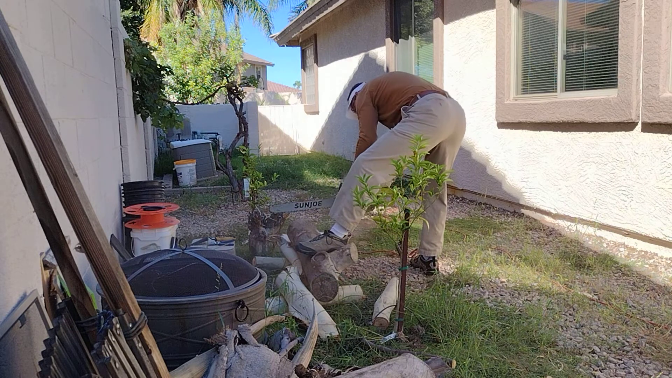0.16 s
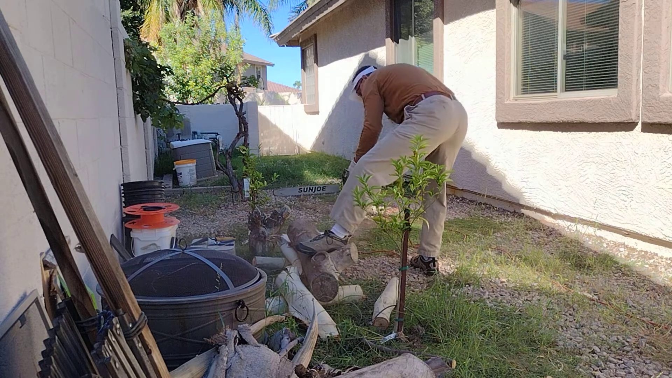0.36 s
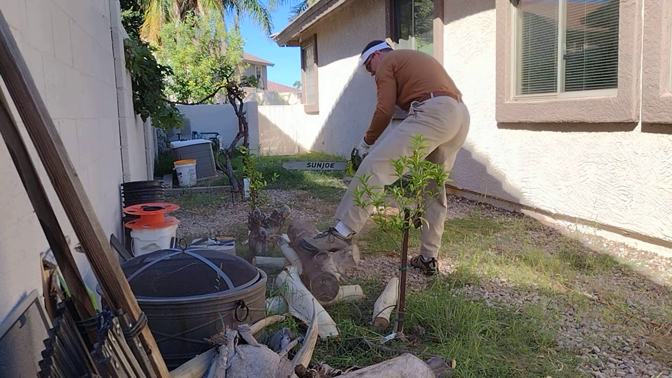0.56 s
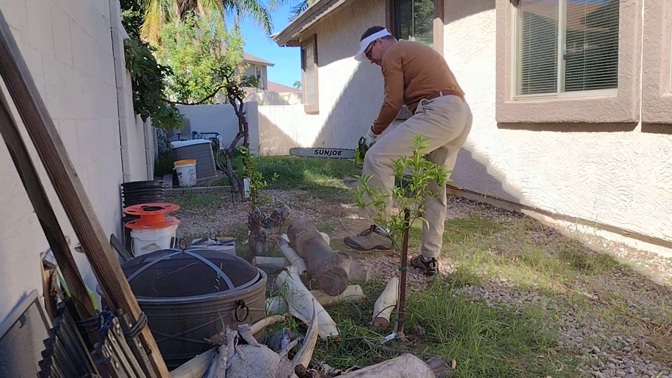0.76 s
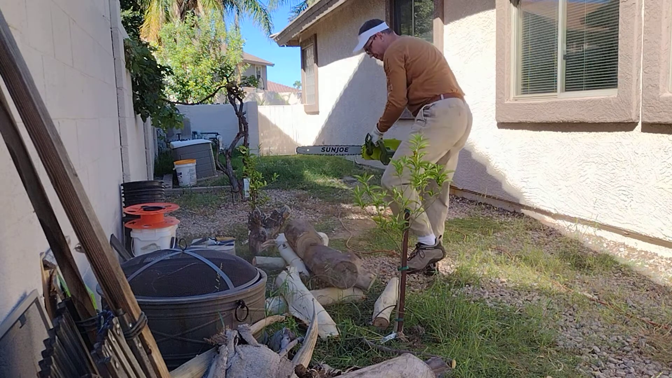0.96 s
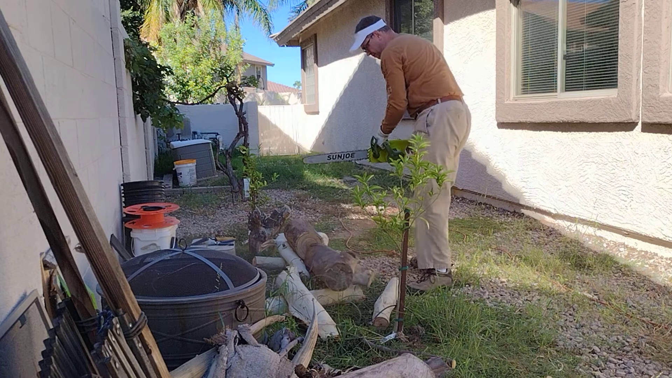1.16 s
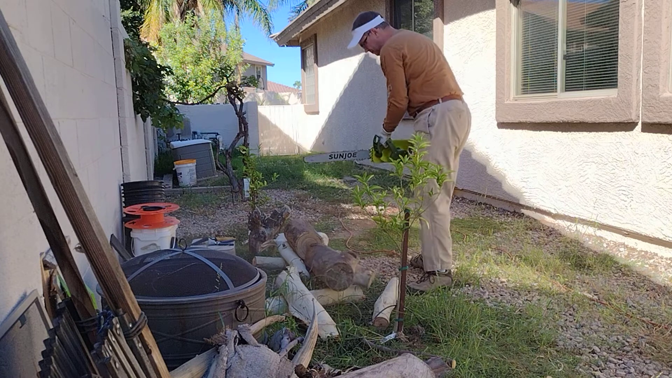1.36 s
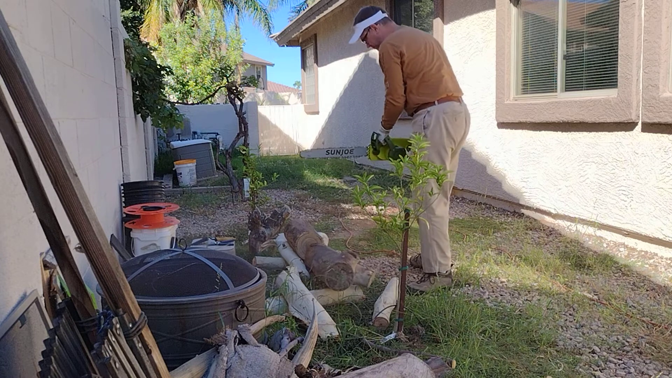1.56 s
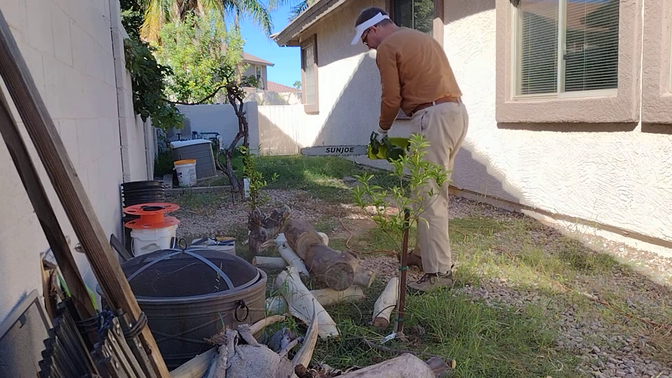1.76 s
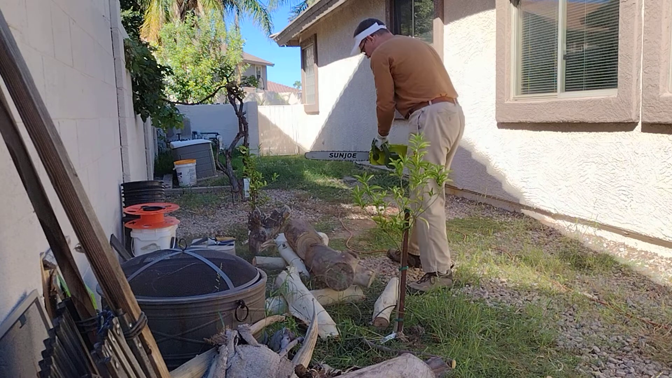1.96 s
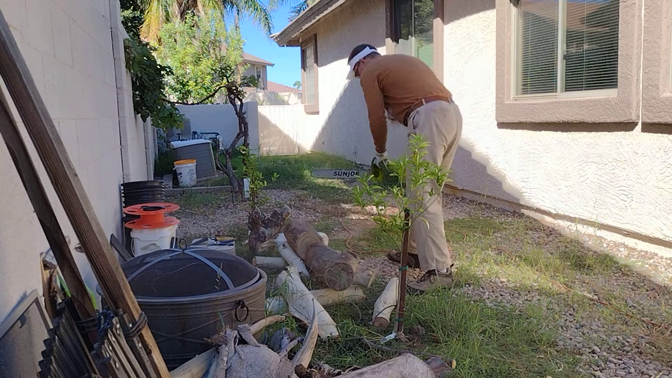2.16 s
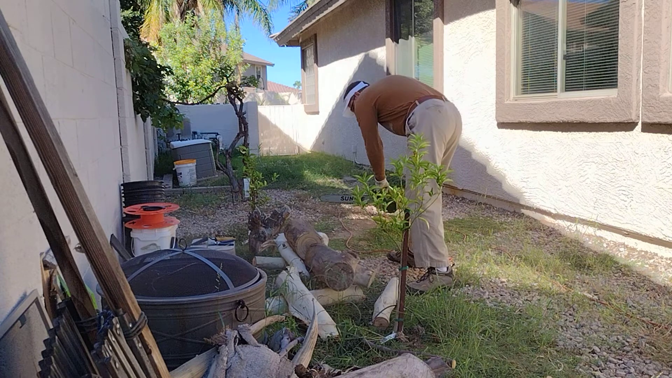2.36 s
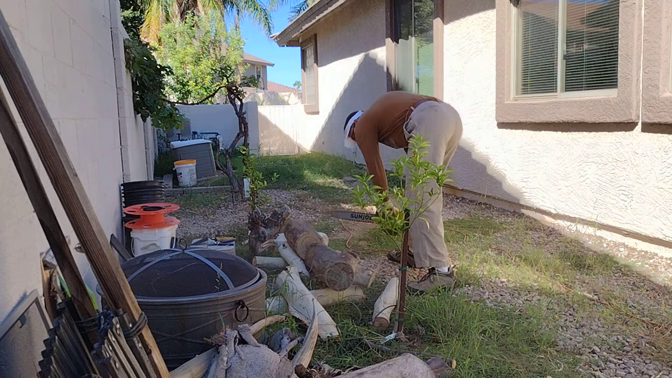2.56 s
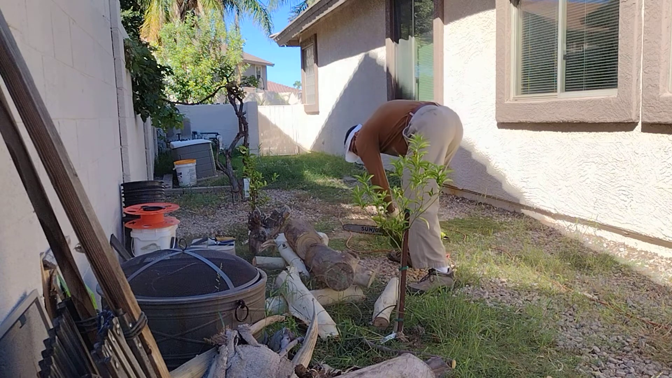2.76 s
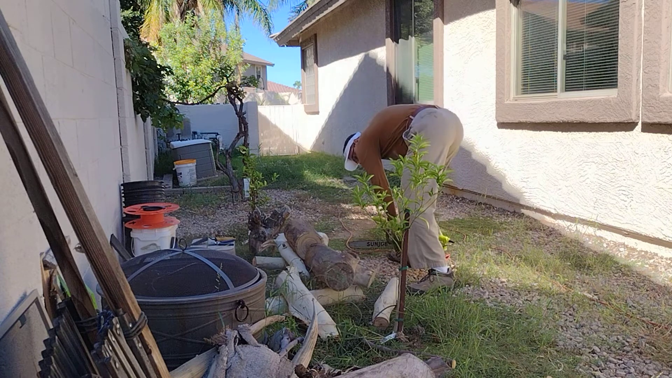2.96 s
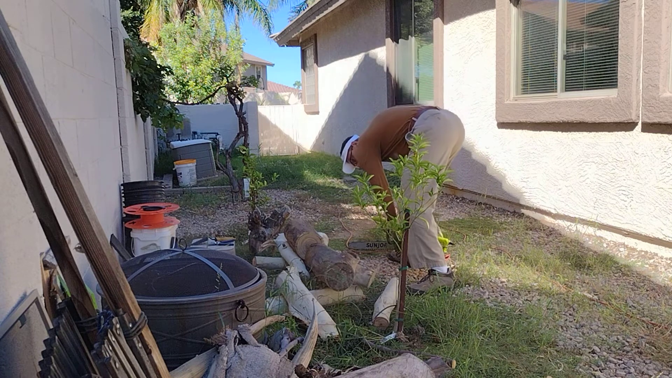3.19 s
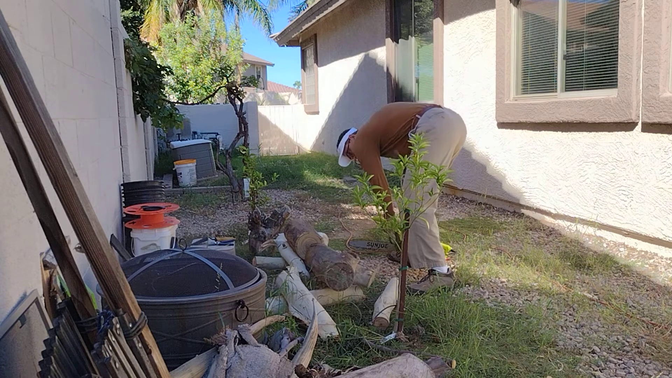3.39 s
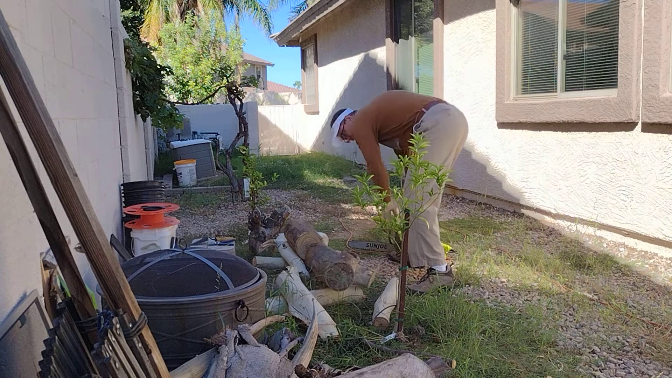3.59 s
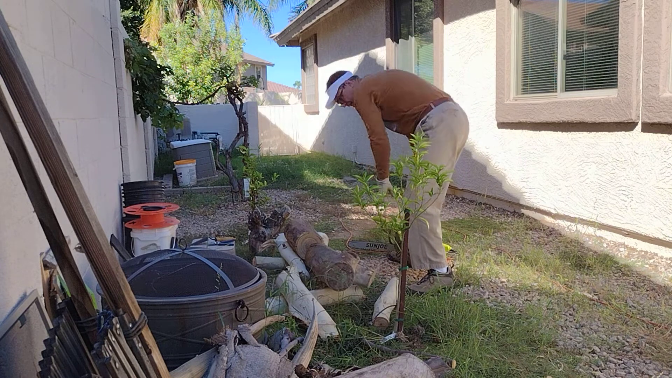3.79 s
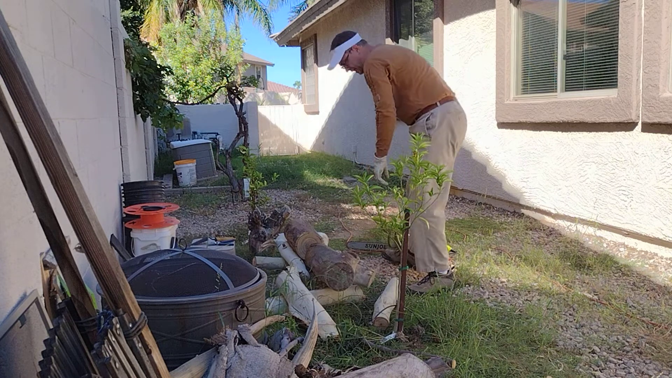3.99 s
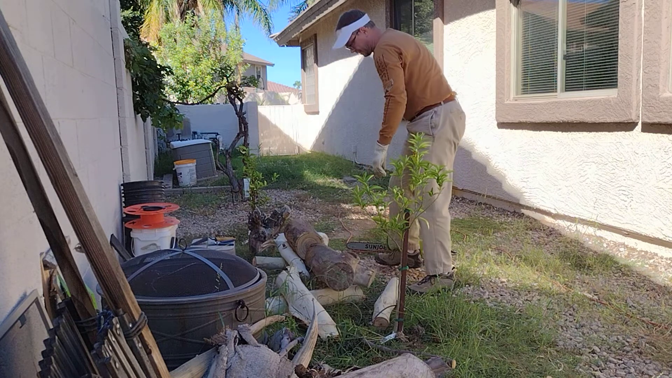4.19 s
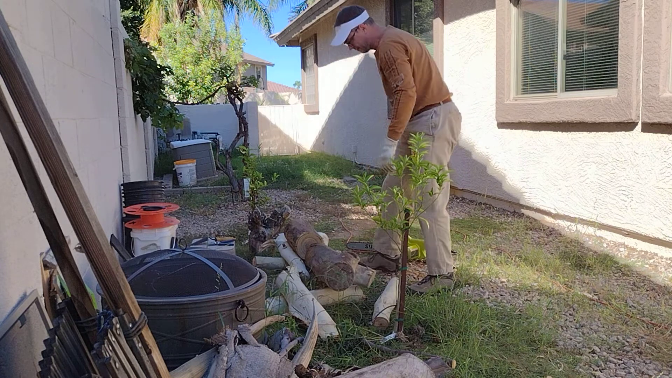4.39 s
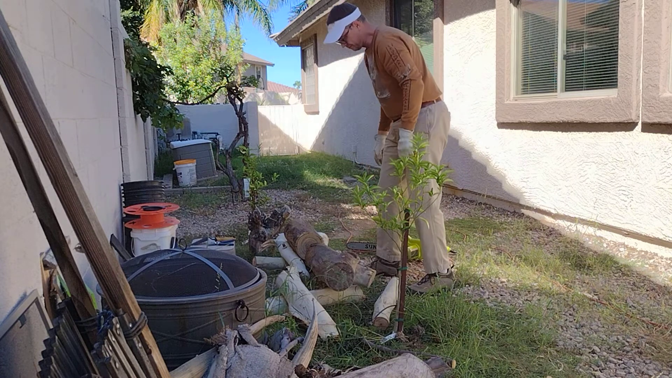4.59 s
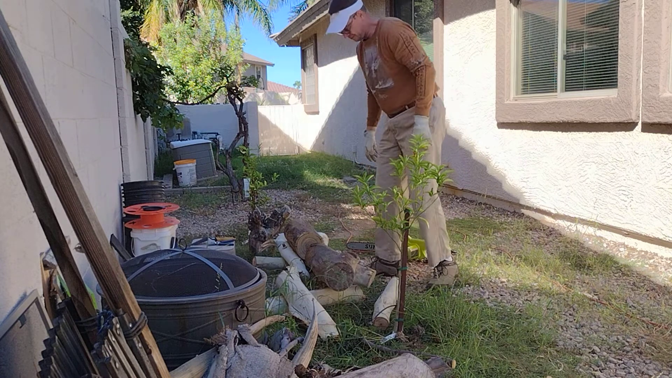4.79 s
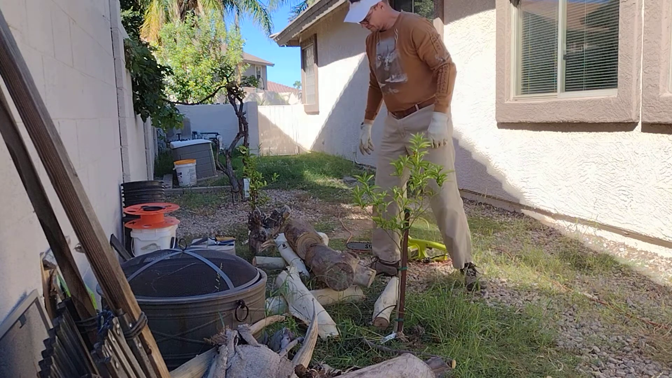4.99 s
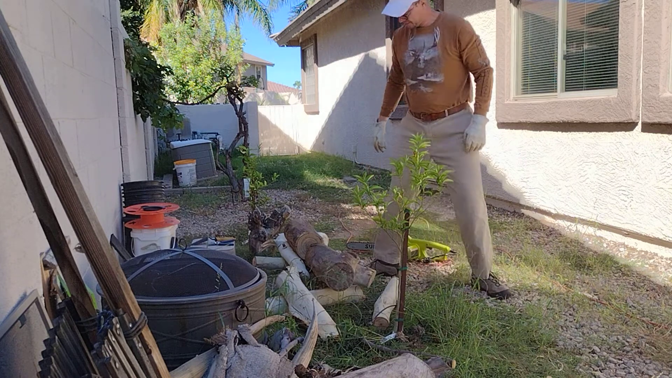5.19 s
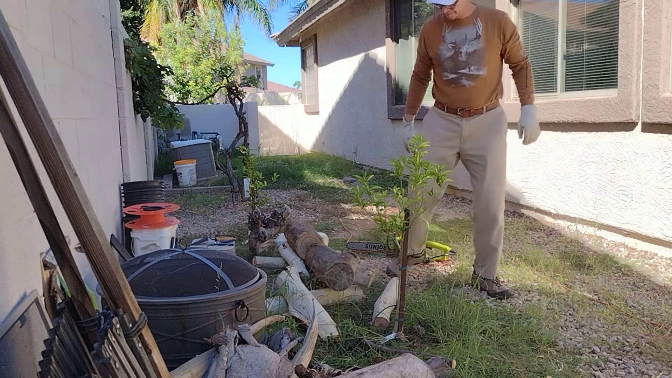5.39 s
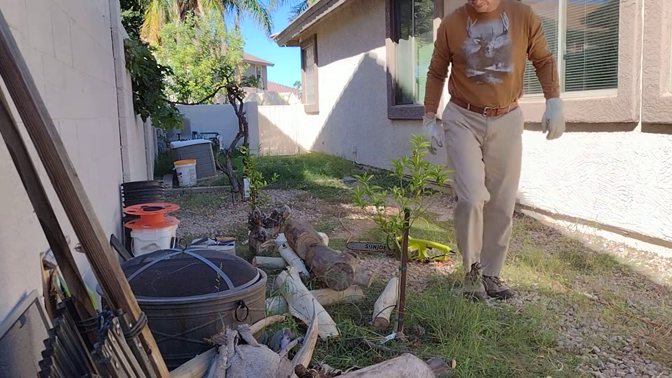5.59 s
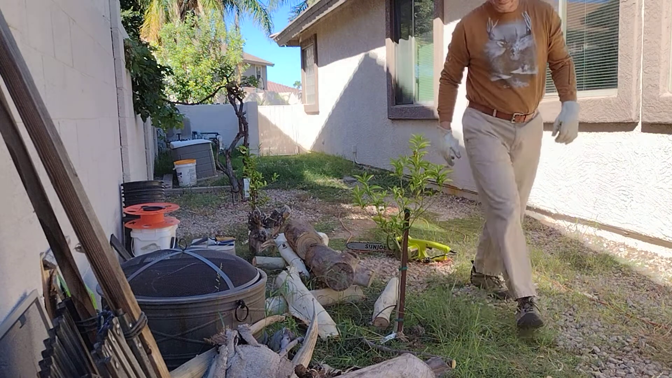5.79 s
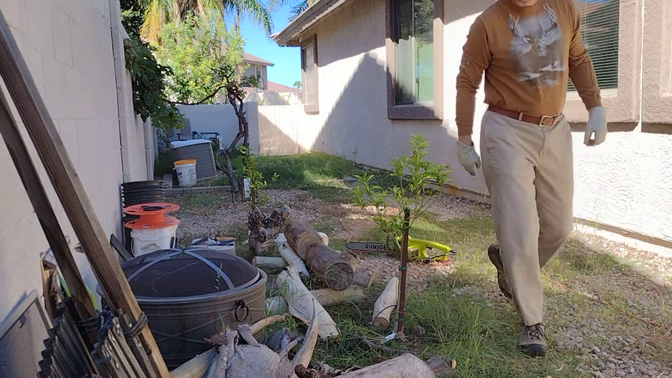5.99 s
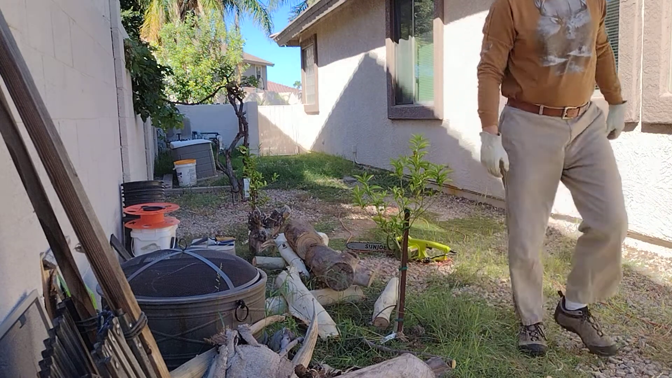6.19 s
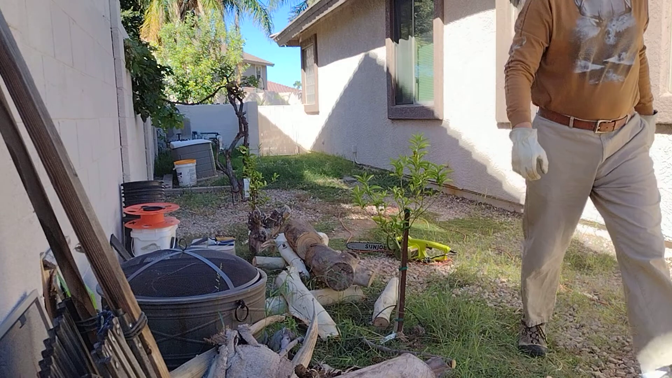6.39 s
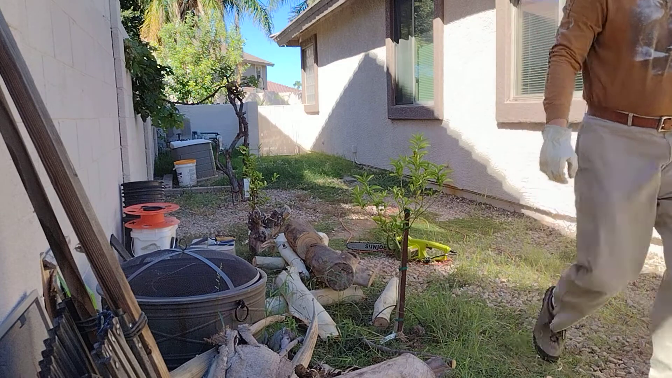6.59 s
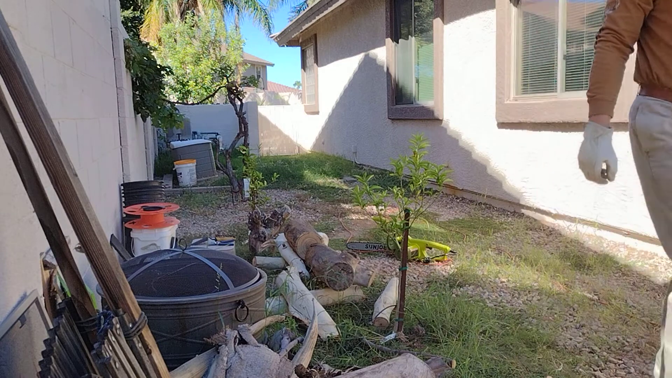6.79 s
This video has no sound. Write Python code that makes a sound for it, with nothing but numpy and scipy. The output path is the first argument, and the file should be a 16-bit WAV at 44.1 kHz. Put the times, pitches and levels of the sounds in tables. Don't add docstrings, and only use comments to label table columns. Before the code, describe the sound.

An electric chainsaw whines down to a stop, is set down with a woody clunk, then footsteps crunch closer over gravel and dry grass.

```python
import sys
import numpy as np
from scipy import signal
from scipy.io import wavfile

SR = 44100
rng = np.random.default_rng(int(sys.argv[2]) if len(sys.argv) > 2 else 0)


def ratio_of_db(decibels):
    return 10 ** (np.asarray(decibels, float) / 20)


def waveform_to_disk(signal):
    frames = np.transpose(np.atleast_2d(signal))
    scaled = np.clip(frames, -1, 1) * 32767
    samples = np.round(scaled).astype(np.int16)
    wavfile.write(sys.argv[1], SR, samples)


N = 302084


def in_time(rows):
    s, *columns = np.transpose(rows)
    return np.array([np.interp(np.arange(N) / SR, s, c) for c in columns])


def at_hz(points, hz):
    table_hz, values = np.transpose(points)
    return np.interp(np.log(hz), np.log(table_hz), values)


def rms_one(x):
    return x / np.sqrt(np.mean(x ** 2) + 1e-20)


def highpass(x, hz):
    return signal.sosfilt(signal.butter(2, hz, "high", fs=SR, output="sos"), x)


def drift(rate, order=1):
    r = np.exp(-80 * np.pi * rate / SR)
    noise = rng.standard_normal(N // 40 + 2002)
    slow = signal.lfilter([1], [1, -2 * r, r * r], noise)[2000:]
    return np.interp(np.arange(0, N, order) / 40, np.arange(len(slow)), rms_one(slow - slow.mean()))


def tone(hz, level_db, wobble_db, rate):
    strength = np.sqrt(2) * ratio_of_db(level_db + wobble_db * drift(rate)[:len(hz)])
    return strength * np.sin(2 * np.pi * (np.cumsum(hz) / SR + rng.random()))


# f/Hz, likeness/0-1
EAR_LIKENESS = [(30, 0.95), (120, 0.88), (300, 0.92), (450, 0.57), (700, 0), (1200, 0), (2500, .2),
                (8000, 0)]


def coloured(gate, colour, zones, zone_db, patchy_db, lean, wide):
    fine = np.geomspace(20, 16000, 600)
    power = ratio_of_db(at_hz(colour, fine)) ** 2 * np.gradient(fine)
    zone_power = [power[(fine > low) & (fine < high)].sum() for low, high in zones]
    bend_db = 20 * np.log10(ratio_of_db(zone_db) / np.sqrt(np.c_[zone_power]))
    middles = [(low ** .75 * high ** .25, low ** .25 * high ** .75) for low, high in zones]
    centres = np.log(middles).ravel()
    n = gate.shape[-1]
    white = gate * rng.standard_normal((2, 2, n))
    out = np.zeros((2, n))
    edges = np.geomspace(colour[0][0], 16500, round(3 * np.log2(16500 / colour[0][0])))
    for k, (low, high) in enumerate(zip(edges, edges[1:])):
        band = signal.butter(2, [low, high], "band", fs=SR, output="sos")
        mid, side = signal.sosfilt(band, white[k % 2])
        hz = np.sqrt(low * high)
        shares = np.array([np.interp(np.log(hz), centres, one.repeat(2)) for one in np.eye(len(zones))])
        patches_db = patchy_db * drift(14, order=64)[:zone_db.shape[1]]
        gain = ratio_of_db(at_hz(colour, hz) + shares @ bend_db + patches_db) * np.sqrt(SR / 2)
        gain = np.interp(np.arange(n) / 64, np.arange(len(gain)), gain)
        alike = np.clip(at_hz(EAR_LIKENESS, hz), -1, 1)
        spread = wide * np.sqrt((1 - alike) / (1 + alike)) * side * [[1], [-1]]
        ears = ratio_of_db(at_hz(lean, hz) * np.array([[.5], [-.5]]))
        out += gain * ears * (mid + spread)
    return out


def ring(clicks, hz, t60):
    r, w = ratio_of_db(-60 / (t60 * SR)), 2 * np.pi * hz / SR
    return signal.lfilter([0, np.sin(w)], [1, -2 * r * np.cos(w), r * r], clicks)


def resonant(x, peaks):
    out = x.copy()
    for hz, width_hz, lift_db in peaks:
        r = np.exp(-np.pi * width_hz / SR)
        poles = [1, -2 * r * np.cos(2 * np.pi * hz / SR), r * r]
        out += (ratio_of_db(lift_db) - 1) * signal.lfilter([(1 - r * r) / 2, 0, (r * r - 1) / 2], poles, x)
    return out


def yard(x, wet_db):
    n, t = x.shape[1], np.arange(SR // 3) / SR
    noise = signal.lfilter([.6], [1, -.2], rng.standard_normal((2, 2, len(t))))
    washes = highpass(noise * ratio_of_db(-60 * t / .24) * (t > .003), 330)
    washes = washes / np.sqrt((washes ** 2).sum(axis=2, keepdims=True))
    turn = 2 * np.pi * 1.3 * np.arange(n) / SR
    shares = [np.cos(turn), np.sin(turn)]
    wet = sum(signal.oaconvolve(x * share, wash, axes=1)[:, :n] for share, wash in zip(shares, washes))
    return (x + ratio_of_db(wet_db) * wet) / np.sqrt(1 + ratio_of_db(wet_db) ** 2)


BRIGHT_SHARE = [-1.0, 0, 1.0, .8]


def swells(rows, zone_db):
    s, rise, fall, level_db, bright_db = np.transpose(rows)[:, :, None]
    t = np.arange(0, N, 64) / SR - s
    shape = ratio_of_db(level_db - 20 * np.maximum(-t / rise, t / fall)) ** 2
    return ratio_of_db(np.array(zone_db)[:, None] + np.outer(BRIGHT_SHARE, bright_db)) ** 2 @ shape


FULL_SPEED_DB = [-41, -36, -44, -50.5]
DB_PER_DECADE = [28, 29.5, 40.5, 52.1]
CHIPS_DB = [-42, -43, -30, -32]
CHIPS_END_DB_PER_S = [40, 40, 60, 200]
# t/s, level/dB
LAST_LINKS = [
    (1.18, -57),
    (1.535, -60),
    (1.69, -60),
    (1.757, -63),
    (1.805, -58),
]


def saw_levels(whine_hz):
    t = np.arange(len(whine_hz)) * 64 / SR
    rattle_db = np.c_[FULL_SPEED_DB] + np.c_[DB_PER_DECADE] * np.log10(whine_hz / whine_hz[0])
    rattle_db = rattle_db - 130 * (t - 1.8).clip(0)
    chips_db = np.c_[CHIPS_DB] - 28 * t - np.c_[CHIPS_END_DB_PER_S] * (t - .5).clip(0)
    catches = [(s, .016, .05, db, 0) for s, db in LAST_LINKS]
    links = swells(catches, [-1, 1, -11, -18])[:, :len(t)]
    return 10 * np.log10(ratio_of_db(rattle_db) ** 2 + ratio_of_db(chips_db) ** 2 + links + 1e-13)


# low f/Hz, high f/Hz
SAW_ZONES = [(350, 1000), (1000, 2900), (2900, 6000), (6000, 15500)]
# f/Hz, level/dB per Hz
SAW_COLOUR = [(88, -40.5), (150, -7), (213, -19), (291, -10.5), (420, -8), (684, -4), (864, -3),
              (2890, -10), (3440, -3), (4980, -11), (7640, 0), (15700, -10)]
# f/Hz, level/dB
SAW_LEAN = [(60, -2), (180, -10), (550, 0.5), (1650, 1), (4970, -4), (15000, 1.5)]


def chain_rattle(shaft_hz, levels_db):
    n = len(shaft_hz)
    links = np.cumsum(shaft_hz * 3 * (1 + .03 * drift(60)[:n])) / SR % 1
    gate = rms_one(.7 + ratio_of_db(3 * drift(71)[:n]) * np.exp(-3.0 * links))
    return coloured(gate, SAW_COLOUR, SAW_ZONES, levels_db, patchy_db=0.5, lean=SAW_LEAN, wide=0.55)


# turns off, level/dB
SIDEBANDS = [(0, 0), (.5, -7), (-.5, -11)]
# f/Hz, level/dB
WHINE_COLOUR = [(450, -90), (900, -82), (1150, -74), (1350, -65), (1550, -72), (1800, -77), (2400, -69),
                (3100, -76), (3700, -76), (4700, -70), (5300, -75), (5900, -74), (6600, -70), (7600, -45),
                (8300, -51), (8900, -51), (9700, -44)]


def motor_whine(whine_hz, shaft_hz):
    n, out = len(whine_hz), 0
    for turns, side_db in SIDEBANDS:
        hz = (whine_hz + turns * shaft_hz) * (1 + .002 * drift(60)[:n])
        out = out + tone(hz, at_hz(WHINE_COLOUR, whine_hz) + side_db, wobble_db=3, rate=20)
    slot_hz = 24 * shaft_hz
    slot_colour = [(400, -85), (560, -75), (720, -68), (900, -74), (2400, -70), (3500, -80), (7500, -70)]
    slot_db = at_hz(slot_colour, slot_hz)
    return out + tone(slot_hz * (1 + .006 * drift(40)[:n]), slot_db, wobble_db=4, rate=20)


# multiple of the turn, level/dB
SHAFT = [(1, -56.5), (2, -54.5), (3, -50.5), (6, -49), (9, -48.5), (12, -50), (40 / 3, -46), (18, -56)]


def shaft_hum(shaft_hz, load_db):
    n = len(shaft_hz)
    return sum(tone(turns * shaft_hz * (1 + .012 * drift(25)[:n]), level_db + load_db, wobble_db=1.5, rate=15)
               for turns, level_db in SHAFT)


def gear_teeth(shaft_hz, load_db, housing_db):
    n = len(shaft_hz)
    turn = 2 * np.pi * np.cumsum(shaft_hz * (1 + .006 * drift(15)[:n])) / SR
    comb = np.zeros(n)
    for k in range(4, 29):
        tooth_db = rng.normal(0, 1.5) - .5 * (k - 10)
        comb += np.sin(k * turn + 2 * np.pi * rng.random()) * ratio_of_db(tooth_db)
    level_db = housing_db.repeat(64)[:n] - 21 - .15 * load_db.clip(-35, 0)
    return ratio_of_db(level_db) * highpass(comb, 650)


# t/s, f/Hz
SPEED = [(0, 10130), (.2, 8910), (.47, 7355), (.7, 6150), (.85, 5355), (1.0, 4620), (1.15, 3940),
         (1.32, 3280), (1.55, 2200), (1.7, 1420), (1.8, 920), (1.9, 450)]
# t/s, share/0-1
SWING = [
    (0, 0),
    (.25, .2),
    (.5, 1),
    (.95, 1),
    (1.3, .6),
    (1.8, .1),
]
# f/Hz, width/Hz, level/dB
HOUSING = [(480, 150, 2), (1900, 610, 1.5), (2500, 370, 3), (2580, 120, 1.5), (3350, 120, 2),
           (3976, 71, -0.5), (4540, 78, -2.5)]


def saw():
    n = round(2.1 * SR)
    whine_hz = in_time(SPEED)[0, :n]
    shaft_hz = whine_hz / 33
    levels_db = saw_levels(whine_hz[::64])
    load_db = 45 * np.log10(whine_hz / whine_hz[0])
    rattle = chain_rattle(shaft_hz, levels_db)
    whine = motor_whine(whine_hz, shaft_hz)
    teeth = gear_teeth(shaft_hz, load_db, levels_db[1])
    swung = in_time(SWING)[0, :n].clip(0, 1)
    end_on = resonant(rattle + teeth, [(864, 110, 5)])
    side_on = resonant(rattle + teeth, [(1190, 150, 6)])
    shell = (1 - swung) * end_on + swung * side_on
    body = ratio_of_db(-2) * resonant(shell, HOUSING) + shaft_hum(shaft_hz, load_db) + .4 * whine
    lead = round(.2 * SR)
    echoed = yard(np.pad(body, ((0, 0), (lead, 0)), "reflect"), wet_db=2.0)[:, lead:]
    sound = echoed + (.9 * whine + ratio_of_db(-1.5) * teeth) * ratio_of_db([[-1.5], [1.5]])
    return np.pad(sound, ((0, 0), (0, N - n)))


# t/s, blade rate f/Hz, blade level/dB, how far the exhaust faces this way level/dB
PLANE = [
    (0, 108.2, -51, -6),
    (.7, 107.8, -48, 5.5),
    (1.5, 107.3, -49, -4.5),
    (2.2, 106.8, -53, -10),
    (3, 106.4, -54.5, -5),
    (3.8, 105.8, -53, 2.5),
    (5.2, 105.05, -54, -1),
    (6.0, 104.6, -56, 0),
    (6.85, 104.3, -55, -1),
]
# times the blade rate, level/dB, share of the blade swell, share of the facing
EXHAUST = [(2, -64.5, 1.88, 0.0), (5 / 2, -65, .4, .4), (17 / 6, -70, 0.0, 1.1), (3, -69, 0.0, 2.1)]
# sixths of the blade rate, level/dB below the blades
FAINT_ORDERS = [(9, -22.5), (11, -25), (14, -29), (16, -26), (19, -30), (20, -31.5)]


def plane():
    blade_hz, blade_db, facing_db = in_time(PLANE)
    swell_db = blade_db - blade_db.mean()
    out = tone(blade_hz, blade_db, wobble_db=1.5, rate=1)
    for k, level_db, swell, facing in EXHAUST:
        exhaust_db = level_db + swell * swell_db + facing * facing_db
        out += tone(k * blade_hz, exhaust_db, wobble_db=1.5, rate=3)
    for k, level_db in FAINT_ORDERS:
        out += tone(k / 6 * blade_hz, blade_db.mean() + level_db, wobble_db=0.5, rate=.7)
    return out


# t/s, f/Hz, level/dB
ENGINE = [
    (0, 73.5, -67),
    (.7, 75.5, -59),
    (1.3, 77.5, -61),
    (2, 79, -65),
    (3.2, 80.7, -60),
    (4.2, 82.2, -58),
    (5, 83, -61),
    (5.8, 83.5, -63),
    (6.1, 83.5, -71),
]


def far_engine():
    hz, level_db = in_time([*ENGINE, (6.3, 83.1, -81)])
    return tone(hz * (1 + 0.0031 * drift(5)), level_db, wobble_db=3.5, rate=2.5)


# t/s, level/dB
AIR = [
    (0, 2.5),
    (1.2, 4.5),
    (2.5, -6.5),
    (3.5, -1),
    (4.6, 2),
    (5.6, 2),
    (6.85, 1),
]
# low f/Hz, high f/Hz
AIR_ZONES = [(30, 150), (280, 700), (1000, 4000), (4000, 15500)]
# f/Hz, level/dB per Hz
AIR_COLOUR = [(25, -17.5), (45, -8), (65, 10), (130, -9), (300, -15.5), (500, -25), (1000, -25.5),
              (2500, -27.5), (5000, -41), (6200, -39.5), (7500, -44), (9300, -40.5), (11000, -49),
              (15700, -45.5)]


def open_air():
    zone_db = np.c_[[-63.5, -72.5, -81, -84]] + np.c_[[0.82, 1.1, 0.14, .05]] * in_time(AIR)[:, ::64]
    return coloured(np.ones(N), AIR_COLOUR, AIR_ZONES, zone_db, patchy_db=-1.5,
                    lean=[(60, 1.2), (1000, .3)], wide=1)


# t/s, peak level/dB, f/Hz
THUDS = [
    (0.949, -31.5, 84.6),
    (4.118, -33, 86.6),
    (4.143, -38, 86.6),
    (4.178, -40, 86.5),
    (6.549, -39.5, 82.6),
]
# t/s, peak level/dB, ring
# f/Hz
TICKS = [(1.063, -64, 3480), (1.1764, -62, 5500), (1.276, -68, 3490), (1.43, -70, 4200), (1.526, -68, 6000),
         (1.54, -68, 4000), (1.613, -72, 3480), (1.688, -70, 4500), (1.759, -72, 6500), (1.9813, -60, 3980),
         (2.0157, -55, 4400), (2.0296, -54, 4600), (2.092, -55, 7480), (2.092, -62, 2900),
         (2.105, -64, 2600), (2.1713, -53, 4400), (2.3449, -64, 2220), (2.4497, -63, 6010),
         (2.5475, -67, 5930), (3.385, -60, 7500), (3.43, -60, 8000), (3.505, -60, 3900), (3.512, -58, 2400),
         (3.512, -62, 8000), (3.525, -60, 3900), (3.546, -57, 2400), (3.55, -60, 3900), (4.114, -46, 2780),
         (4.1185, -48, 5200), (4.125, -50, 3800), (4.166, -56, 3000), (4.5197, -63, 2020),
         (4.5421, -56, 2200), (4.565, -60, 7500), (4.6394, -58, 3600), (4.685, -60, 2600),
         (4.7756, -59, 2700), (4.7756, -63, 5800), (4.9193, -64, 3400), (5.1253, -67, 6000),
         (5.1807, -66, 2620), (5.224, -56, 6200), (5.2311, -52, 2670), (5.235, -54, 3900),
         (5.252, -58, 2400), (5.2964, -56, 3900), (5.3383, -54, 3500), (5.3383, -55, 5900),
         (5.4456, -63, 7000), (5.671, -54, 6200), (5.6765, -51, 3700), (5.6765, -55, 6500),
         (5.982, -52, 3900), (5.982, -55, 7500), (5.998, -56, 3600), (6.481, -54, 4200), (6.503, -54, 5000),
         (6.511, -48, 5500), (6.518, -54, 3500), (6.557, -50, 2300), (6.562, -50, 5500), (6.601, -50, 3400)]
# t/s, peak level/dB, ring f/Hz, crack level/dB
KNOCKS = [(1.981, -51, 385, -73), (2.014, -60, 425, -68), (2.032, -44.5, 426, -62), (2.064, -50, 430, -75),
          (2.078, -48, 480, -75), (2.092, -52, 900, -75), (2.172, -46, 500, -60), (2.345, -59, 397, -67),
          (2.449, -50, 411, -66.5), (2.835, -67.5, 394, -64), (3.361, -35, 1250, -70),
          (3.388, -50, 1250, -70), (3.421, -50, 1230, -65), (3.546, -50, 880, -75), (3.64, -53, 860, -80),
          (3.995, -45, 620, -63), (4.07, -45, 403, -61), (4.1105, -40, 1300, -50), (4.113, -27, 400, -38),
          (4.1152, -22, 850, -45), (4.1225, -29, 450, -48), (4.127, -32, 1300, -52), (4.133, -36, 800, -60),
          (4.146, -35, 450, -60), (4.16, -36, 600, -62), (4.1635, -38, 900, -62), (4.173, -36, 420, -65),
          (4.185, -40, 380, -70), (4.585, -48, 700, -70), (4.599, -41, 480, -65), (4.776, -51.5, 406, -67),
          (5.229, -45, 976, -60.5), (5.297, -44, 1170, -70), (5.302, -38, 1130, -68),
          (5.313, -38, 1000, -70), (5.629, -53, 1394, -68), (5.671, -27.5, 1505, -56.5),
          (5.719, -51, 500, -73), (5.944, -38, 1765, -63.5), (5.98, -53, 900, -49),
          (6.239, -50, 540, -54.5), (6.3625, -35, 1750, -77.5), (6.3685, -38, 1900, -78),
          (6.437, -39, 1700, -72), (6.479, -50, 560, -60), (6.494, -45, 471, -70), (6.508, -40, 692, -62),
          (6.531, -27, 466, -56.5), (6.541, -36, 450, -65), (6.548, -32, 600, -65), (6.558, -35, 900, -56),
          (6.566, -38, 700, -62), (6.578, -42, 600, -68), (6.607, -42, 527, -74)]
# f/Hz, time to fade 60 dB t/s
KNOCK_T60 = [(400, 0.042), (1500, 0.026)]


def knocks():
    out, t = np.zeros((2, N + SR)), np.arange(SR // 6) / SR
    bright = signal.butter(2, [2800, 10500], "band", fs=SR, output="sos")
    dull = signal.butter(4, 2500, fs=SR, output="sos")
    modes = [(1, 1.6), (1.14, 1), (1.32, .8), (.82, 0.7), (1.68, 0.6), (2.02, 0.7), (3.0, .4)]
    for s, peak_db, hz, crack_db in KNOCKS:
        t60 = at_hz(KNOCK_T60, hz)
        push = np.gradient(t * np.exp(-t * hz / .16))
        rings = sum(share * rng.uniform(.6, 1.2) * ring(push, hz * ratio, t60 / ratio) for ratio, share in modes)
        rings = highpass(signal.sosfilt(dull, rings), .6 * hz)
        crack = signal.sosfilt(bright, rng.standard_normal(len(t)))
        crack *= np.exp(-t / 0.006) + 0.35 * ratio_of_db(-60 * t / t60)
        sound = ratio_of_db(peak_db - 0.8) * rings / np.abs(rings).max() + ratio_of_db(crack_db - 3.0) * crack
        out[:, round(s * SR):][:, :len(t)] += sound * ratio_of_db([[-1.25], [1.25]])
    for s, peak_db, hz in TICKS:
        push = rng.standard_normal((2, 600)) * np.exp(-t[:600] / .0004)
        snap = ring(push, hz, 22 / hz) + .7 * ring(push, 1.22 * hz, 22 / hz)
        out[:, round(s * SR):][:, :600] += ratio_of_db(peak_db + 9.0) * snap / np.abs(snap).max()
    out += ratio_of_db(-4) * np.roll(highpass(out[::-1], 750), round(.0062 * SR), axis=1)
    for s, peak_db, hz in THUDS:
        push = rng.standard_normal(len(t)) * t * np.exp(-t / 0.004)
        thud = ring(push, hz, .15) + 1.2 * ring(push, 1.9 * hz, .08) + 1.6 * ring(push, 3.3 * hz, .06)
        out[:, round(s * SR):][:, :len(t)] += ratio_of_db(peak_db - 0.5) * thud / np.abs(thud).max()
    return out[:, :N]


GROUND_DB = [4, 0, -7, -24.5]
GRASS_DB = [-30, -20, -9, 0]
TAP_DB = [-10, 0.5, -20, -32]
SHUFFLE_DB = [-4.5, 2.5, -11, -17]
# t/s, time to fade 20 dB t/s, level/dB, brightness level/dB
TREADS = [(1.98, .04, -67, 11), (2.015, .08, -69.5, 11.5), (2.171, 0.18, -67, 6), (2.449, 0.2, -70.5, 2.5),
          (3.385, 0.09, -62, 2), (3.985, .05, -70, 3), (3.996, 0.08, -60, 4), (4.03, .12, -66, 7),
          (4.073, 0.11, -66, 10), (4.113, .12, -48, 1), (4.16, 0.09, -53, 1), (5.226, .12, -59, 4),
          (5.671, .025, -58, 9), (5.981, .1, -55, 4), (6.48, 0.26, -60, 5), (6.533, .13, -51, 0),
          (6.605, 0.14, -58.5, 0)]
# peak t/s, time to 20 dB down t/s, level/dB, brightness level/dB
SCUFFS = [(2.035, .08, -72, 11), (2.08, .06, -70, -5), (2.12, .1, -70, 11), (2.36, 0.16, -73.5, 8),
          (2.55, .1, -78, 9), (2.69, .05, -80, 4), (2.84, -0.04, -82.5, 6), (3.049, -0.2, -81, 6.5),
          (3.53, .1, -67, 5), (3.66, 0.24, -74, -5.5), (4.55, 0.1, -65, 6.5), (4.604, .08, -60, -1),
          (4.7, 0.15, -66.5, 5.5), (5.32, .12, -66, 4), (5.63, 0.07, -66, 0.5), (5.87, .12, -67, 9),
          (5.965, .04, -60, -1), (5.78, .1, -72, 8), (6.07, 0.15, -65.5, 5), (6.24, 0.04, -63.5, 0.5),
          (6.513, 0.025, -56, 7), (6.56, 0.02, -54, 7), (6.805, 0.13, -64, 1.5)]
# t/s, time to fade 20 dB t/s, level/dB
TAPS = [
    (3.362, 0.08, -55.5),
    (5.301, 0.06, -56.5),
    (5.67, .07, -50),
    (5.945, .12, -60),
    (6.364, .12, -63),
    (6.438, .06, -63),
]
# t/s, time to 20 dB down t/s, level/dB
SWISHES = [(3.385, .07, -71), (5.22, .05, -78), (5.64, .03, -76), (5.718, .015, -64), (5.86, .12, -74),
           (5.96, .1, -69), (6.2, .1, -72), (6.36, .05, -78), (6.44, .02, -72), (6.55, .12, -70),
           (6.68, .08, -76), (6.805, .07, -71)]
# t/s, level/dB
SHUFFLE = [
    (1.9, -110),
    (2.0, -85),
    (2.9, -91.5),
    (3.9, -87.5),
    (4.45, -86.5),
    (4.8, -76),
    (5.15, -78),
    (5.5, -71),
    (6.2, -66),
    (6.85, -69.5),
]


def ground_levels():
    rise_s = .002
    contacts = [(s, rise_s, *rest) for s, *rest in TREADS]
    contacts += [(s, length, length, *rest) for s, length, *rest in SCUFFS]
    taps = swells([(s, rise_s, fall, db, 0) for s, fall, db in TAPS], TAP_DB)
    swishes = swells([(s, length, length, db, 0) for s, length, db in SWISHES], GRASS_DB)
    shuffle = ratio_of_db(in_time(SHUFFLE)[:, ::64] + np.c_[SHUFFLE_DB]) ** 2
    return 10 * np.log10(swells(contacts, GROUND_DB) + taps + swishes + shuffle)


def grains(per_s, spread_db):
    sizes = ratio_of_db(spread_db * np.minimum(rng.exponential(size=N), 5)) * rng.choice([-1, 1], N)
    return rms_one(sizes * (rng.random(N) < per_s / SR))


# low f/Hz, high f/Hz
RUSTLE_ZONES = [(350, 1000), (1000, 3500), (3500, 10000), (10000, 15500)]
# f/Hz, level/dB per Hz
GROUND = [(250, -13), (450, 1.5), (1000, -2), (2000, -12), (4000, -19), (7000, -25.5), (10500, -32),
          (12000, -34), (15700, -31)]


def steps():
    block = round(1.9 * SR / 64)
    start = 64 * block
    tail = np.exp(-np.arange(300) / 70)
    tail /= tail.sum()
    crunch = [signal.oaconvolve(grains(per_s=500, spread_db=2.4) ** 2, tail)[start:N].clip(0) for _ in range(2)]
    gate = rms_one(0.48 + np.sqrt(crunch))[:, None]
    sound = coloured(gate, GROUND, RUSTLE_ZONES, ground_levels()[:, block:], patchy_db=2.5,
                     lean=[(300, -.6), (15000, -0.66)], wide=1.25)
    return np.pad(sound, ((0, 0), (start, 0)))


# t/s, length t/s, level/dB
CHIRPS = [(2.36, .07, -89), (2.48, .05, -90), (2.55, .04, -80.5), (2.70, 0.047, -85.5), (2.82, .05, -91),
          (4.25, 0.083, -78), (4.39, .07, -79.5), (4.81, .08, -78.5), (4.95, .07, -81),
          (5.14, 0.044, -84.5), (5.33, 0.072, -79), (5.48, .06, -91), (6.74, .05, -92)]


def chirps():
    t = np.arange(N) / SR
    swell = sum(ratio_of_db(level_db) * np.exp(-(2 * (t - s) / length) ** 4) for s, length, level_db in CHIRPS)
    band = signal.butter(2, [6070 - 450, 6070 + 450], "band", fs=SR, output="sos")
    hiss = rms_one(signal.sosfilt(band, rng.standard_normal((2, N))))
    return swell * ratio_of_db(2.5 * drift(70)) * hiss


# f/Hz, width/Hz, level/dB
SOIL = [(1000, 350, 2.5), (480, 120, 1.5)]
# f/Hz, width/Hz, level/dB
PORTS = [(6070, 670, 2.5), (8150, 1200, 3.5), (8810, 310, -1)]


def scene():
    drone = plane() * ratio_of_db([[1.1], [-1.1]]) + far_engine()
    ground = resonant(steps(), SOIL) + yard(knocks(), wet_db=-4)
    feet = ratio_of_db(-3.5) * resonant(ground, PORTS)
    return saw() + drone + open_air() + feet + chirps()


def low_pass(x):
    return signal.sosfilt(signal.butter(12, 16570, fs=SR, output="sos"), x)


def record(dry):
    top_cut = signal.ellip(12, .5, 70, 15750, fs=SR, output="sos")
    mix = signal.sosfilt(top_cut, highpass(dry, 40))
    return low_pass(mix)


dry = scene()
out = record(dry)
waveform_to_disk(out)
```